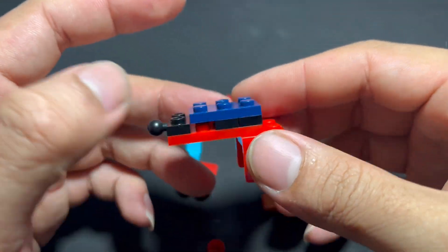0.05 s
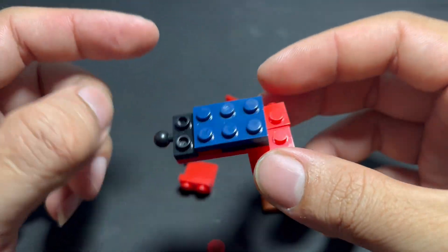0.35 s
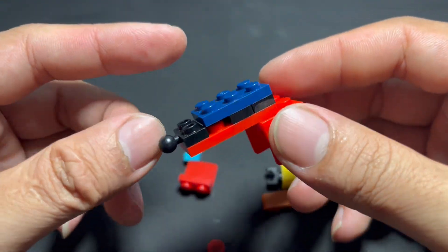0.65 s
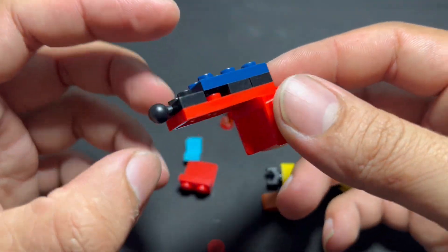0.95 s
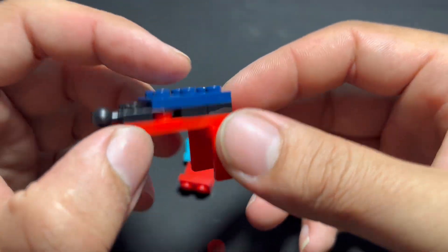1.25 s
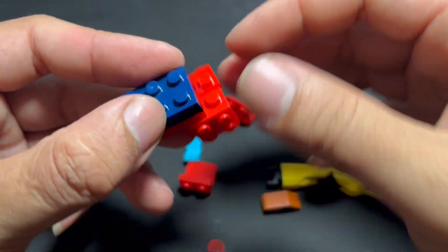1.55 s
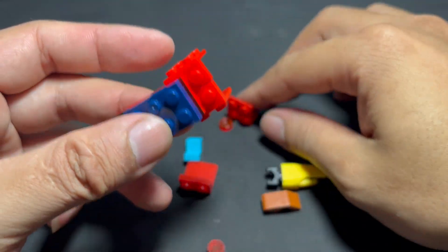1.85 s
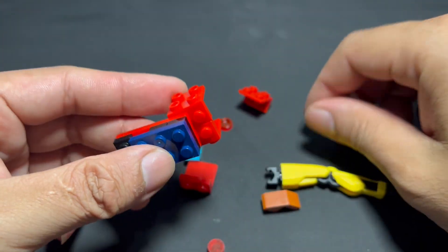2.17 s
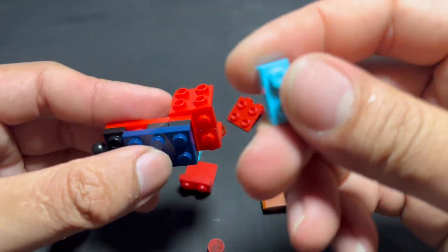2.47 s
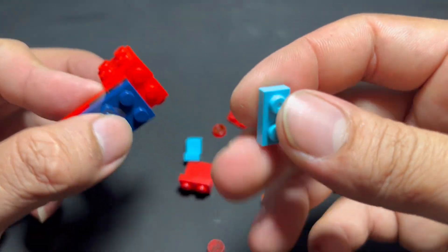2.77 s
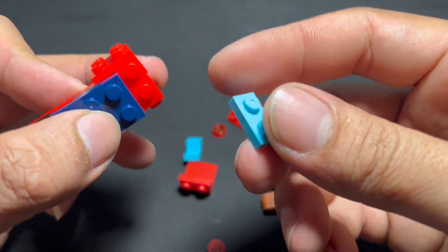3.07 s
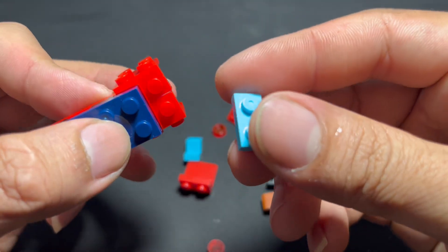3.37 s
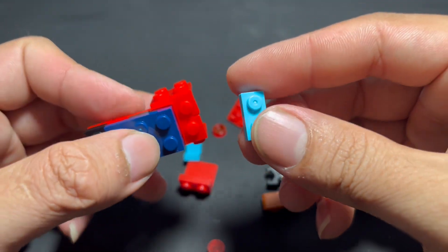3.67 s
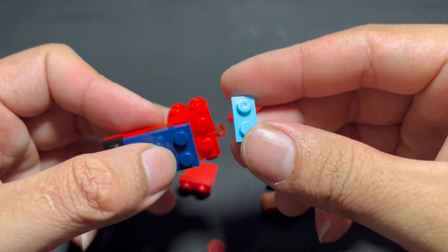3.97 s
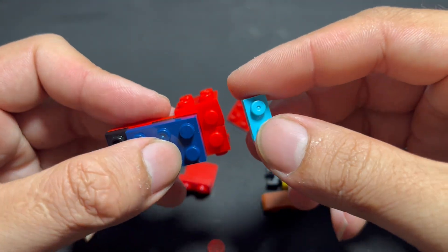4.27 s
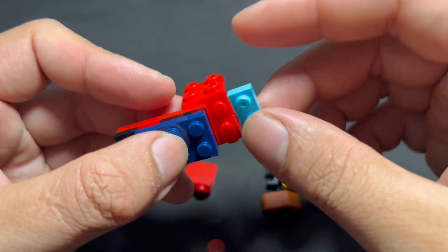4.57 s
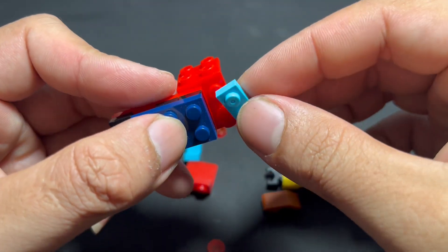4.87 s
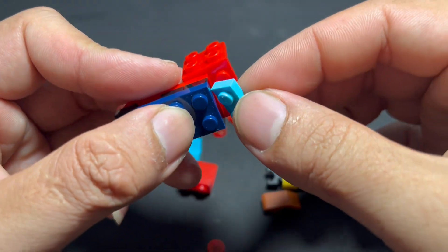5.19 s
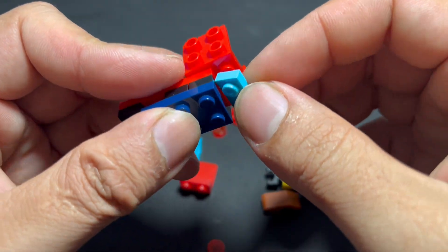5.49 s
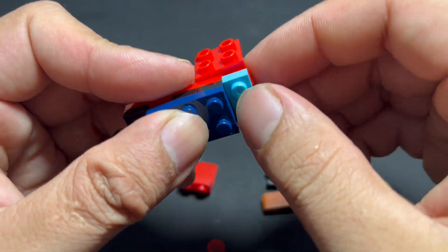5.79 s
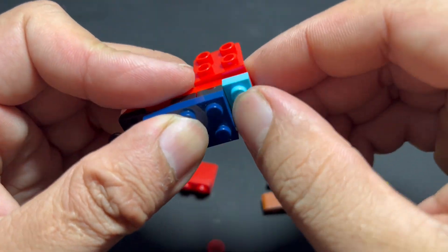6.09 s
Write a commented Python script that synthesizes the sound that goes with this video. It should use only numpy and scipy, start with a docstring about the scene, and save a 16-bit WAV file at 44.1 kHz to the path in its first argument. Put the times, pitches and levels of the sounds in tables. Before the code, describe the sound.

Small plastic bricks tick and rub between fingers, with one clack on a table and one sharp snap, over a low swelling drone.

```python
"""Pressing a plate onto a brick model

Fingers turn a small model of plastic bricks, pick a loose plate off a mat-covered table and press it on.
Skin rubs and squeaks on the plastic, and the hand bumps the table and brushes the mat. Each touch makes
the plastic ring briefly: the studs tick as they seek their place, then seat with one sharp snap.
The small room holds a low swelling drone, a mains hum and a faint hiss."""
import sys
import numpy as np
from scipy import signal
from scipy.fft import rfft, irfft, next_fast_len
from scipy.io import wavfile

SR = 44100
rng = np.random.default_rng(int(sys.argv[2]) if len(sys.argv) > 2 else 0)


def transcribe(u):
    """Save the signal u as a 16-bit wav file named by the first command-line argument.

    u: samples, shape (n,) or (channels, n), limited to [-1, 1]; the rate is SR.
    q: integer samples, one column per channel.
    """
    v = np.clip(np.atleast_2d(u).T, -1, 1)
    q = np.round(v * 32767).astype(np.int16)
    wavfile.write(sys.argv[1], SR, q)


N = 270774
TIME = np.arange(N) / SR


def from_db(db):
    """Turn decibels into a number to multiply by."""
    return 10 ** (np.asarray(db) / 20)


def rms_one(x):
    """Scale a sound to an average power of one."""
    return x / np.sqrt(np.mean(x ** 2) + 1e-30)


def peak_one(x):
    """Scale a sound to a peak of one."""
    return x / np.max(np.abs(x))


def at_hz(points, hz):
    """Read between the rows of a table, with every octave equally wide."""
    row_hz, value = np.transpose(points)
    return np.interp(np.log(np.maximum(hz, 1)), np.log(row_hz), value)


def add(track, s, sound):
    """Mix a sound into a track, starting at s seconds."""
    start = int(s * SR)
    track[start:start + len(sound)] += sound[:N - start]


def drift(per_s):
    """A wandering curve that heads for a new random value per_s times a second."""
    knots = np.arange(0, N / SR + 1, 1 / per_s)
    return np.interp(TIME, knots, rng.standard_normal(len(knots)))


def stroke(s, hold_s, attack_s, release_s):
    """A loudness curve that rises until s seconds, holds, then dies away."""
    rise = np.minimum(TIME - s, 0) / attack_s
    fall = np.maximum(TIME - s - hold_s, 0) / release_s
    return np.exp(np.maximum(rise - fall, -40))


def coloured(noise, colour):
    """Make a noise's lows and highs as strong as a table says, at a power of one."""
    size = next_fast_len(N)
    gain = from_db(at_hz(colour, np.fft.rfftfreq(size, 1 / SR)))
    return rms_one(irfft(rfft(noise, size) * gain, size)[..., :N])


def resonate(force, modes):
    """Ring an object's modes, its natural tones; the wider a mode, the sooner it dies."""
    out = 0
    for k, (hz, width_hz, db) in enumerate(modes):
        r = np.exp(-np.pi * width_hz / SR)
        gain = (-1) ** k * from_db(db) * (1 - r * r) / 2
        feedback = [1, -2 * r * np.cos(2 * np.pi * hz / SR), r * r]
        out = out + signal.lfilter([gain, 0, -gain], feedback, force + 1e-18)
    return out


def contact(grit, decay_s, size):
    """The force of a touch: one push, then a dying scatter of tiny slips."""
    scatter = rng.standard_normal(size) * np.exp(-TIME[:size] / decay_s)
    force = grit * scatter / np.linalg.norm(scatter)
    force[0] += 1
    return force


# How alike two microphones hear sound from all around. Each row: frequency in Hz, likeness from 0 to 1.
LEFT_RIGHT_LIKENESS = [(60, .999), (150, 0.9), (400, 0.45), (700, 0.1), (1100, 0.17), (2500, 0.24),
                       (4500, 0.37), (6000, 0.46), (8000, 1), (16000, 1)]

def diffuse(size):
    """Stereo noise that reaches the two microphones from all around."""
    padded = next_fast_len(size)
    mid, side = rfft(rng.standard_normal((2, padded)))
    alike = np.clip(at_hz(LEFT_RIGHT_LIKENESS, np.fft.rfftfreq(padded, 1 / SR)), 0, 1)
    pair = np.sqrt((1 + alike) / 2) * mid + np.sqrt((1 - alike) / 2) * side * [[1], [-1]]
    return irfft(pair, padded)[:, :size]


# The tone of the ventilation and of the hiss. Each row: frequency in Hz, relative level in dB.
AIR_COLOUR = [(20, -14.5), (35, -17), (62, 3), (90, -8), (150, -13.5), (230, -22), (320, -22), (450, -28),
              (590, -31.5), (780, -38), (1100, -44), (1600, -52.5), (4000, -68.5), (8000, -95.5)]
HISS_COLOUR = [(2000, 4), (3400, -2), (4150, -2), (4500, 10.5), (4850, 13.5), (5100, 1.5), (5450, -6.5),
               (7000, -3), (9000, -6), (13000, -10), (15000, -21.5)]

def ventilation_and_hiss(air_db=-52, hiss_db=-79):
    """Dull ventilation noise, and a hiss with one narrow band standing out."""
    air = coloured(diffuse(N), AIR_COLOUR)
    air = signal.sosfilt(signal.butter(2, 3500, fs=SR, output="sos"), air)
    return from_db(air_db) * air + from_db(hiss_db) * coloured(diffuse(N), HISS_COLOUR)


# The drone's swells. Each row: start in seconds, hold in seconds, level in dB, growth in dB per second.
DRONE_SWELLS = [(0.04, 0.88, -39.5, -2.5), (0.93, 0.59, -35.5, 2.5), (2.06, 1.06, -35, -4.5),
                (4.8, 1.23, -49.5, -1.5)]

def drone(rest_db=-56, start_hz=57.9, sag_hz_per_s=0.48, throb_per_s=4.55, throb_db=2.5, crest_s=1.42):
    """A deep, throbbing tone swells and sinks back while its pitch slowly sags."""
    level = np.full(N, from_db(rest_db))
    for s, hold_s, db, db_per_s in DRONE_SWELLS:
        held = from_db(db + db_per_s * np.clip(TIME - s, 0, hold_s))
        level = np.maximum(level, held * stroke(s, hold_s, attack_s=0.093, release_s=0.15))
    throb = from_db(throb_db * np.cos(2 * np.pi * throb_per_s * (TIME - crest_s)))
    phase = 2 * np.pi * np.cumsum(start_hz - sag_hz_per_s * TIME) / SR
    return np.sqrt(2) * level * throb * np.sin(phase)


# The tones of the hum. Each row: pitch in Hz, relative level in dB.
HUM_TONES = [(64.4, -53.5), (142, -68), (200.6, -72), (301, -71.5), (402, -83), (501.5, -75), (602, -78.5),
             (703, -86), (1002, -91)]

def mains_hum(gain_db=-1, waver_hz=0.84):
    """Steady tones waver a little in pitch; the lowest beats against the drone."""
    out = np.zeros(N)
    for hz, db in HUM_TONES:
        phase = 2 * np.pi * np.cumsum(hz + waver_hz * drift(11)) / SR
        out += from_db(db + gain_db) * np.sin(phase)
    return np.sqrt(2) * out


# The table top's low, middle and high modes. Each row: pitch in Hz, width in Hz, relative level in dB.
THUD_MODES = [(103.6, 8.45, 2.5), (154.2, 7.05, 2.5), (210, 21, -28)]
KNOCK_MODES = [(272, 50, 0), (361.5, 30.6, 7.5), (463, 74, 1.5), (521, 32, 7.5), (606, 51, -3.5)]
CLACK_MODES = [(820, 510, -13.5), (990, 140, 4.5), (1343, 140, 0.5), (1630, 160, -4.5), (1793, 64, -4),
               (2145, 290, -13.5)]
# The hand's bumps. Each row: start in seconds, then relative levels in dB of thud, knock and clack.
HAND_BUMPS = [(0.17, -49.5, -66, -80), (1.833, -37.5, -42.5, -59), (1.843, -31, -43.5, -46),
              (2.013, -42.5, -40, -59.5), (2.099, -44.5, -33.5, -41), (2.171, -55, -64, -56.5),
              (2.294, -43.5, -47.5, -54.5), (2.534, -46.5, -65, -70)]

def table_bumps(thud_db=6, knock_db=8, clack_db=9):
    """The hand bumps the table top, which rings with a long thud, a shorter knock and a quick clack."""
    out = np.zeros(N)
    for s, thud, knock, clack in HAND_BUMPS:
        levels_db = (thud + thud_db, knock + knock_db, clack + clack_db)
        for modes, db in zip((THUD_MODES, KNOCK_MODES, CLACK_MODES), levels_db):
            force = contact(grit=0.8, decay_s=0.011, size=16384)
            add(out, s, from_db(db) * peak_one(resonate(force, modes)))
    return out


def friction(noise, colour, grain_db):
    """Rubbing is countless tiny slips of uneven size, so its noise is grainy."""
    grain = from_db(grain_db * (drift(1500) + drift(90) / 2))
    return coloured(noise * grain, colour)


# The tone of skin on plastic. Each row: frequency in Hz, relative level in dB.
SKIN_COLOUR = [(1500, -26), (3300, -16), (4500, -19.5), (5900, 0), (7500, -7), (9500, -2.5), (11300, -1),
               (13300, -0.5), (14600, -7), (16000, -19)]
# The modes that rubbing stirs. Each row: pitch in Hz, width in Hz, relative level in dB.
RUB_MODES = [(3410, 90, 8), (5760, 530, 0)]
# Finger slides. Each row: start in seconds, hold in seconds, relative level in dB,
# share of ringing in dB, pitch of the skin's rasp in Hz.
FINGER_SLIDES = [(0.608, 0.0094, -74, -5, 13500), (0.68, 0.067, -83.5, 2, 13200),
                 (1.079, .08, -79.5, -13.5, 10100), (1.258, 0.015, -75.5, -17, 13600),
                 (1.32, 0.051, -80, -9, 11500), (2.272, .015, -64, -8, 12000),
                 (2.41, 0.024, -68, -3, 11500), (2.629, 0.11, -70.5, -14, 11500),
                 (2.78, 0.011, -71.5, -14, 13400), (3.31, .14, -81, -3.5, 11400),
                 (3.637, 0.012, -76.5, -22, 12400), (4.173, 0.0088, -64.5, -6.5, 10500),
                 (4.728, 0.0089, -74, -13, 13200), (4.85, 0.2, -82, 1, 11000)]
# Light brushes as the grip shifts. Each row: start in seconds, hold in seconds, relative level in dB.
GRIP_SHIFTS = [(0.575, .03, -85), (1.2, 1, -85.5), (2.8, 0.28, -91), (3.45, 0.37, -94), (4.36, 0.45, -87),
               (6.0, 0.063, -83.5)]

def finger_rubs(catch_db=3, rasp_width_hz=800, attack_s=0.009, release_s=0.0096):
    """Skin slides on plastic; its ridges catch and let go, and a firm grip makes the model ring."""
    hiss = friction(rng.standard_normal(N), SKIN_COLOUR, grain_db=4.0)
    ring = rms_one(resonate(hiss, RUB_MODES))
    slides = np.zeros(N)
    for s, hold_s, db, ring_db, rasp_hz in FINGER_SLIDES:
        rasp = resonate(hiss, [(rasp_hz, rasp_width_hz, 1)])
        rub = from_db(-3) * hiss + rasp + from_db(ring_db) * ring
        slides += from_db(db) * stroke(s, hold_s, attack_s, release_s) * rub
    touch = sum(from_db(db) * stroke(s, hold_s, attack_s, release_s) for s, hold_s, db in GRIP_SHIFTS)
    wander = from_db(-1 + 3 * drift(25))
    brushing = wander * touch * (hiss + from_db(-11) * ring)
    return from_db(catch_db * drift(160)) * (slides + brushing)


def plastic_click(modes, grit, crack_db, decay_s, crack_s=0.0061, crack_band_hz=(2200, 12000)):
    """A touch rings the plastic and adds a short crack of noise; the peak is one."""
    ring = resonate(contact(grit, decay_s, size=2048), modes)
    burst = rng.standard_normal(len(ring)) * np.exp(-TIME[:len(ring)] / crack_s)
    crack = signal.sosfilt(signal.butter(1, crack_band_hz, "band", fs=SR, output="sos"), burst)
    return peak_one(rms_one(ring) + from_db(crack_db) * rms_one(crack))


# The modes of the brick model. Each row: pitch in Hz, width in Hz, relative level in dB.
MODEL_MODES = [(1315, 220, -35), (2175, 190, -27), (3320, 230, -13), (3830, 510, -20.5), (4960, 580, -17),
               (5760, 120, -2.5), (6700, 860, -8), (7390, 200, -0.5), (8580, 440, 5), (9470, 1290, 3),
               (9810, 660, 4), (11120, 300, -1.5), (13300, 590, -8.5), (16080, 490, -4.5)]
# Brick touching brick. Each row: start in seconds, peak level in dB, brightness (higher is sharper).
BRICK_TOUCHES = [(0.62, -56, -11), (0.6794, -54, -4.5), (1.311, -45.5, 19), (1.8438, -44, 1.5),
                 (2.7093, -47.5, 1.5), (3.1619, -52, -0.5), (4.557, -59, 7), (4.7724, -51.5, -8.5),
                 (4.8566, -50, -5), (4.896, -37, -4), (5.1407, -59, 5), (5.177, -51, -4),
                 (5.1931, -38.5, -6), (5.2084, -49.5, -4)]

def brick_ticks():
    """Light touches ring the model; a brighter touch has weaker low modes and stronger high ones."""
    out = np.zeros(N)
    for s, db, brightness in BRICK_TOUCHES:
        low_db, high_db = 2 - 1.3 * brightness, 0.85 * brightness
        tilt = [(4500, low_db), (7000, 1.5), (8500, -11.5), (11000, high_db), (15000, high_db - 11)]
        modes = [(hz, width, level + at_hz(tilt, hz)) for hz, width, level in MODEL_MODES]
        add(out, s, from_db(db) * plastic_click(modes, grit=1.0, crack_db=-8.5, decay_s=0.0025))
    return out


# The hand's strokes over the mat. Each row: start in seconds, hold in seconds, relative level in dB.
MAT_STROKES = [(1.56, .12, -75), (1.70, 0.016, -59), (1.89, .05, -65.5), (1.955, 0.14, -58),
               (2.166, 0.0028, -58.5)]
# The tone of rubbing on the mat. Each row: frequency in Hz, relative level in dB.
MAT_COLOUR = [(250, 15.5), (600, 6), (1200, 5), (2000, 3.5), (3000, -2.5), (3900, -2.5), (4700, -6),
              (7000, -11), (9400, -7), (12000, -7), (15500, -13)]
# The modes of the loose plate. Each row: pitch in Hz, width in Hz, relative level in dB.
PLATE_MODES = [(2030, 330, -21), (3910, 300, -6.5), (4900, 510, -13.5), (5800, 280, -6.5),
               (6630, 970, -6.5), (7600, 1700, -8.5), (9600, 920, -4), (10200, 1400, -9.5), (11750, 170, 0),
               (12600, 110, -8), (15100, 330, -21)]

def mat_sweep(gain_db=5.5, slide_db=-62, slide_middle_s=2.005, half_length_s=0.12, mat_cut_hz=7500):
    """The hand brushes the mat and pushes the plate, which rings as it slides, dulled by the mat."""
    strokes = [from_db(db + gain_db) * stroke(s, hold_s, attack_s=0.019, release_s=0.041)
               for s, hold_s, db in MAT_STROKES]
    brush = np.max(strokes, axis=0) * friction(diffuse(N), MAT_COLOUR, grain_db=1.5)
    drag = friction(rng.standard_normal(N), MAT_COLOUR, grain_db=2.5)
    drag = signal.sosfilt(signal.butter(1, mat_cut_hz, fs=SR, output="sos"), drag)
    push = from_db(slide_db) * np.exp(-((TIME - slide_middle_s) / half_length_s) ** 4)
    return brush + push * rms_one(resonate(drag, PLATE_MODES))


def bend(sound, travel_s):
    """High bending waves cross the plastic sooner than low ones; travel_s is the time at 8000 Hz."""
    hz = np.fft.rfftfreq(len(sound), 1 / SR)
    return irfft(rfft(sound) * np.exp(-4j * np.pi * travel_s * np.sqrt(8000 * hz)))


def outward_pulse(colour, size=512):
    """The pulse that a click sends out to the walls, with an energy of one."""
    hz = np.fft.rfftfreq(size, 1 / SR)
    pulse = np.roll(irfft(from_db(at_hz(colour, hz))), size // 4)
    return pulse / np.linalg.norm(pulse)


# The plate tips and falls back. Each row: start in seconds, peak level in dB.
PLATE_LANDINGS = [(2.288, -19), (2.293, -28)]
# The tone the plate sends in all directions. Each row: frequency in Hz, relative level in dB.
PLATE_OUTWARD_COLOUR = [(500, -10), (2000, -4.5), (3200, -6.5), (4100, -2.5), (5200, -4.5), (6300, -1.5),
                        (8000, -6.5), (11100, -3), (11700, 1.5), (12200, -3), (13500, -8), (15500, -13)]

def plate_clack(outward_db=10):
    """The plate clacks on the table as it is picked up; returns the direct and the outward sound."""
    direct, outward = np.zeros((2, N))
    for s, db in PLATE_LANDINGS:
        click = plastic_click(PLATE_MODES, grit=0.43, crack_db=-10.5, decay_s=0.0032)
        add(direct, s, from_db(db) * peak_one(bend(click, travel_s=0.00054)))
        add(outward, s, from_db(db + outward_db) * outward_pulse(PLATE_OUTWARD_COLOUR))
    return direct, outward


# Thin squeaks. Each row: start in seconds, hold in seconds, top pitch in Hz, level in dB.
SKIN_SQUEAKS = [(3.941, .04, 9470, -83.5), (4.165, 0.25, 10080, -76.5)]

def skin_squeaks(arch_hz_per_s2=26000, flutter_db=5, upper_ratio=1.41, upper_db=-19, fade_s=0.012):
    """Skin sticks and squeaks: a fluttering tone rises and falls, with a weaker one above it."""
    out = np.zeros(N)
    jitter = 1 + 0.012 * drift(1100)
    for s, hold_s, top_hz, db in SKIN_SQUEAKS:
        hz = np.maximum(top_hz - arch_hz_per_s2 * (TIME - s - hold_s / 2) ** 2, top_hz / 2)
        phase = 2 * np.pi * np.cumsum(hz * jitter) / SR
        tone = np.sin(phase) + from_db(upper_db) * np.sin(upper_ratio * phase)
        out += from_db(db) * stroke(s, hold_s, fade_s, fade_s) * tone
    return from_db(flutter_db * drift(70)) * out


# The studs snap home. One row: time in seconds, peak level in dB.
SNAP_HOME = (5.5265, -5.5)
# The tone a brick sends in all directions. Each row: frequency in Hz, relative level in dB.
BRICK_OUTWARD_COLOUR = [(500, -28), (1800, -27), (3200, -13.5), (4700, -13), (6050, 0.5), (6900, -0.5),
                        (8800, -2), (10200, 5), (12500, -15.5), (14000, -12), (15300, -10)]

def stud_snap(jolt_db=-41, scrape_db=-60, scrape_s=0.0082, outward_db=9, early_db=-10, early_s=0.00048):
    """Studs scrape in, slip home in two steps and jolt the model; returns direct and outward sound."""
    direct, outward = np.zeros((2, N))
    s, db = SNAP_HOME
    scrape_level = from_db(scrape_db) * np.exp(-((TIME - s) / scrape_s) ** 2)
    direct += scrape_level * coloured(rng.standard_normal(N), BRICK_OUTWARD_COLOUR)
    for slip_s, slip_db in ((s - early_s, db + early_db), (s, db)):
        force = bend(contact(grit=0.36, decay_s=0.002, size=2048), travel_s=0.001)
        add(direct, slip_s, from_db(slip_db) * peak_one(resonate(force, MODEL_MODES)))
    dull_modes = [(170, 71, 3.0), (340, 200, -8), (982, 900, -14)]
    jolt = resonate(contact(grit=0.93, decay_s=0.0029, size=4096), dull_modes)
    add(direct, s, from_db(jolt_db) * peak_one(jolt))
    add(outward, s, from_db(db + outward_db) * outward_pulse(BRICK_OUTWARD_COLOUR))
    return direct, outward


# How long the room rings. Each row: frequency in Hz, seconds to fade by 60 dB.
ECHO_FADE = [(100, 0.51), (1000, .4), (4000, 0.47), (9000, 0.52), (15000, 0.45)]
# The tone of the room's echo. Each row: frequency in Hz, relative level in dB.
ECHO_COLOUR = [(100, -11.5), (500, -0.5), (2000, -1), (4000, -1.5), (6200, -3.5), (10000, -6), (15000, -9)]

def room_echo(sound, build_s=0.012, size=32768):
    """A wash of echoes builds up as the walls answer, then each band dies at its own pace."""
    noise, t = diffuse(size), TIME[:size]
    edges_hz = np.geomspace(70, 19000, 17)
    build_up = 1 - np.exp(-(t / build_s) ** 2)
    response = 0
    for low, high in zip(edges_hz, edges_hz[1:]):
        hz = np.sqrt(low * high)
        decay = from_db(-60 * t / at_hz(ECHO_FADE, hz)) * build_up
        band = signal.sosfilt(signal.butter(2, [low, high], "band", fs=SR, output="sos"), noise)
        response = response + from_db(at_hz(ECHO_COLOUR, hz)) * band * decay / np.linalg.norm(decay)
    return signal.fftconvolve(sound[None], response, axes=1)[:, :N]


def scene():
    """The model is held close to the microphones; the table lies farther off, so it has more echo."""
    held = brick_ticks() + finger_rubs() + skin_squeaks()
    bumps = table_bumps()
    snap, snap_outward = stud_snap()
    plate, plate_outward = plate_clack()
    direct = held + snap + bumps + plate + mat_sweep()
    to_walls = from_db(-6) * (held + plate) + from_db(4) * bumps
    to_walls += from_db(-3) * (snap_outward + plate_outward)
    return direct + room_echo(to_walls) + drone() + mains_hum() + ventilation_and_hiss()


# How much louder the left microphone is. Each row: frequency in Hz, left minus right in dB.
LEFT_LOUDER = [(500, 0), (1300, 0), (2500, 5.5), (4500, 6.5), (6000, 3.3), (7000, 2.5), (8000, 0),
               (16000, 0)]
# How far the left wave runs ahead of the right. Each row: frequency in Hz, lead in radians.
LEFT_AHEAD = [(0, 0), (500, .15), (1000, .6), (3000, .9), (4600, .6), (5500, -.7), (6500, -1.3),
              (8330, -3.14), (12000, -6.3), (16000, -9.6)]

def record(dry, cutoff_hz=16500):
    """The microphones lean left in the upper mids and fall out of step in the treble; the top is cut."""
    size = next_fast_len(N + 2048)
    hz = np.fft.rfftfreq(size, 1 / SR)
    lead = np.interp(hz, *np.transpose(LEFT_AHEAD))
    left = from_db(at_hz(LEFT_LOUDER, hz) / 2) * np.exp(0.5j * lead)   # each side takes half
    pair = irfft(rfft(dry, size) * np.array([left, 1 / left]), size)[:, :N]
    return signal.sosfilt(signal.ellip(10, 0.3, 90, cutoff_hz, fs=SR, output="sos"), pair)


dry = scene()
out = record(dry)
transcribe(out)
```